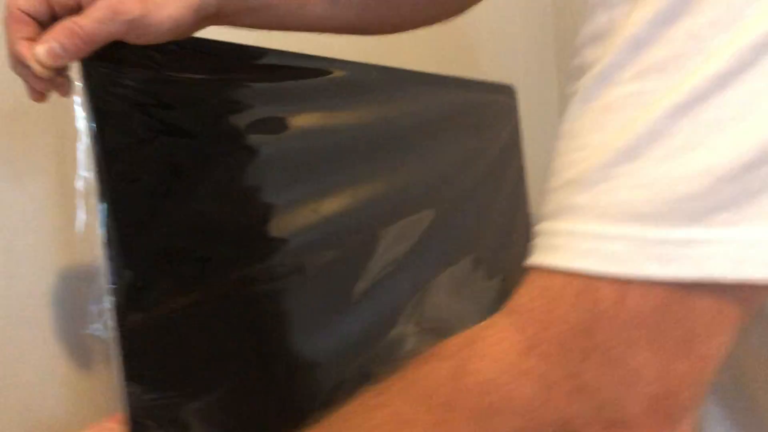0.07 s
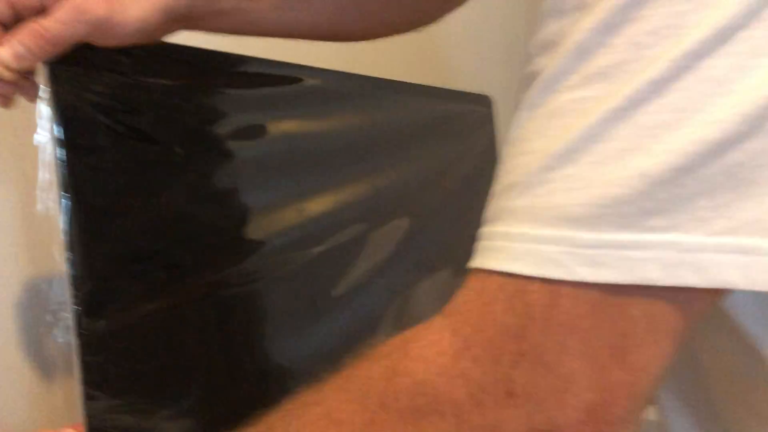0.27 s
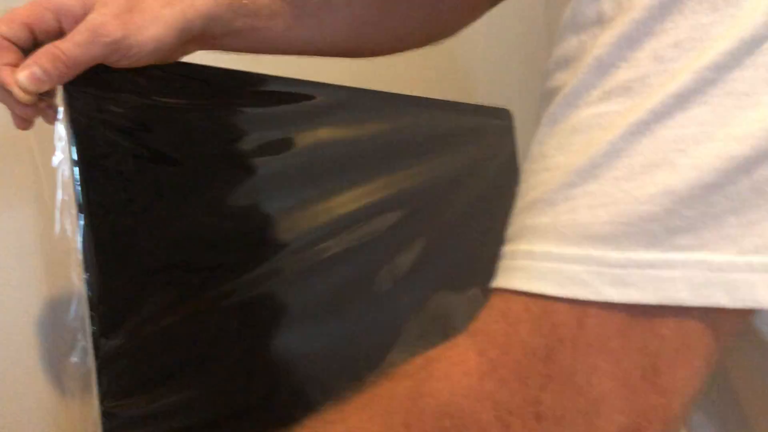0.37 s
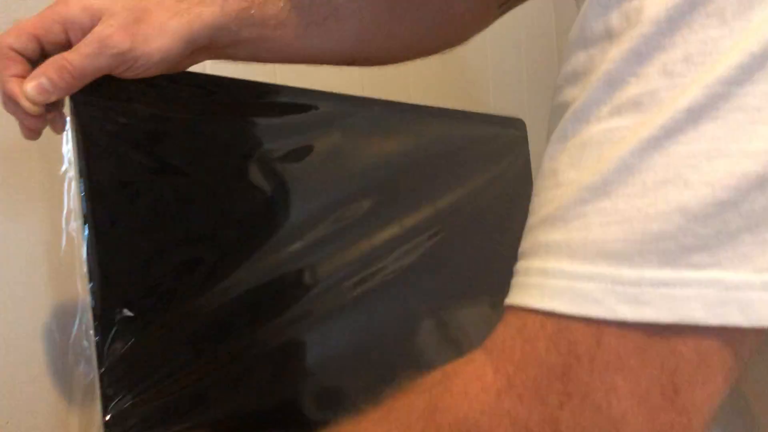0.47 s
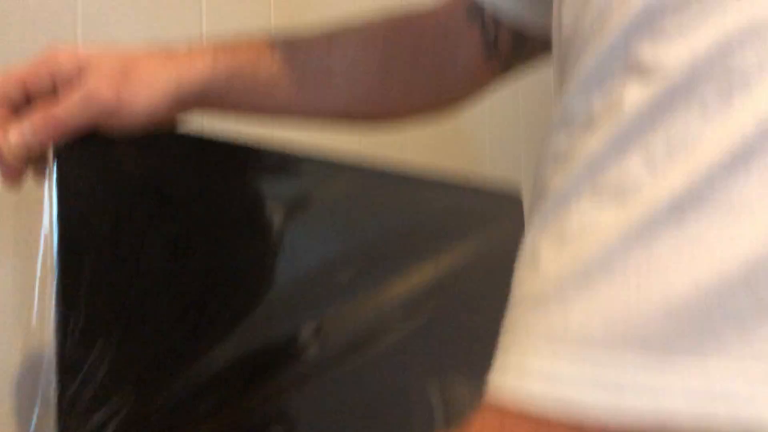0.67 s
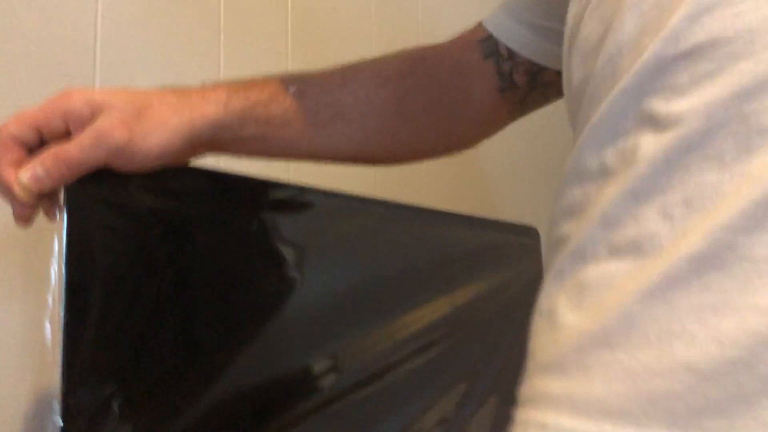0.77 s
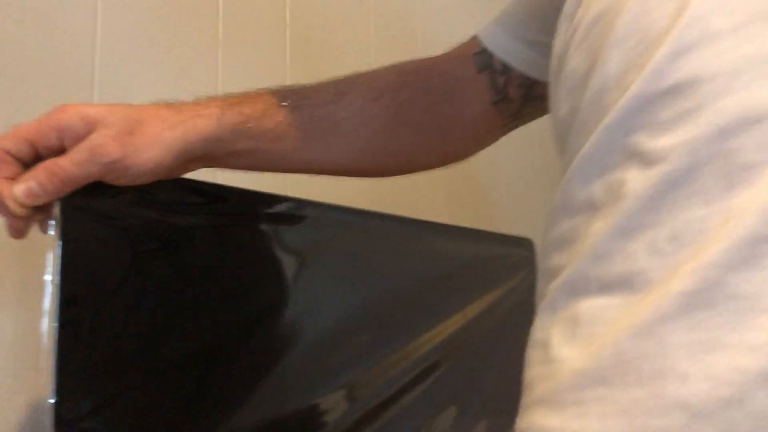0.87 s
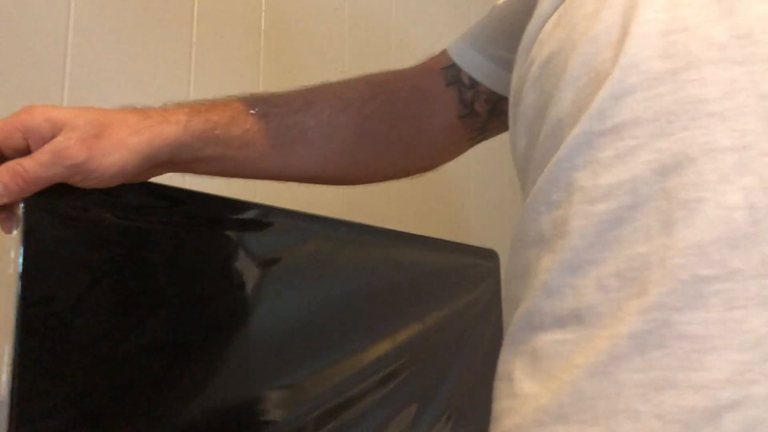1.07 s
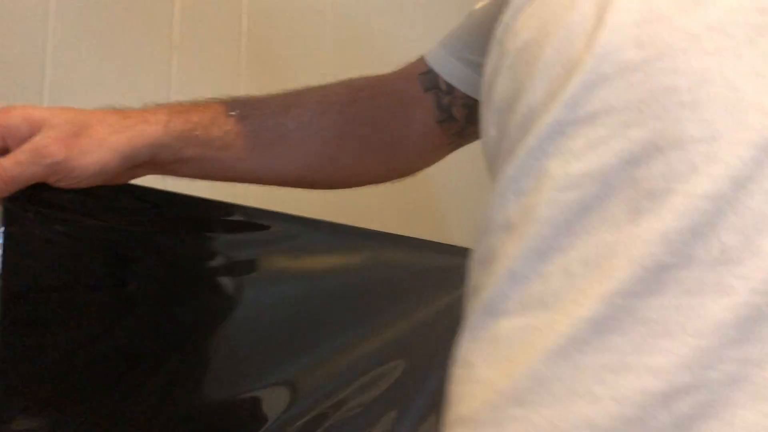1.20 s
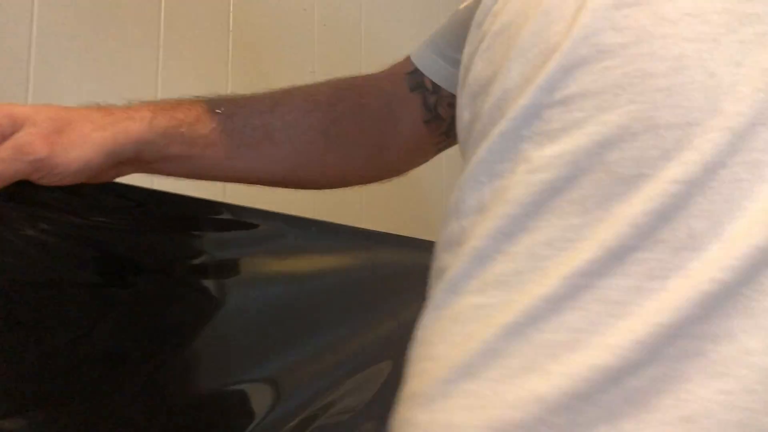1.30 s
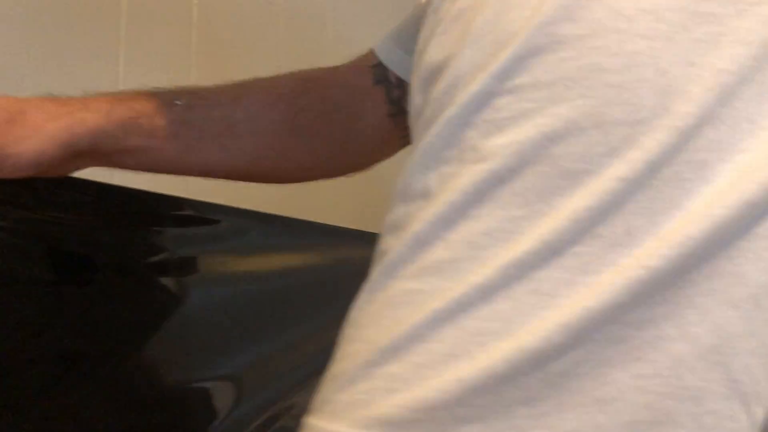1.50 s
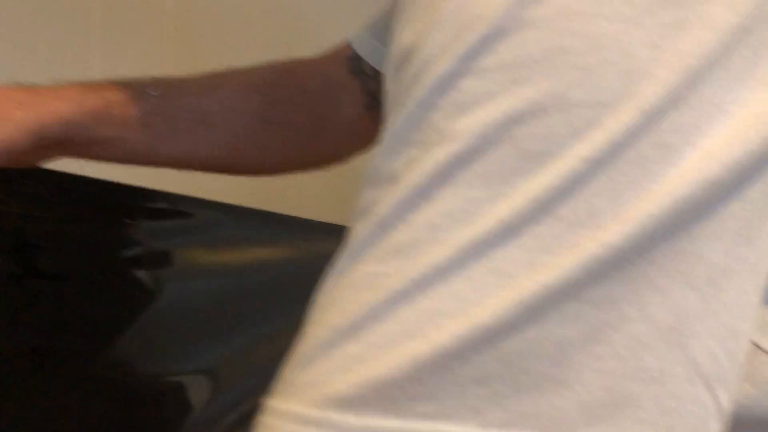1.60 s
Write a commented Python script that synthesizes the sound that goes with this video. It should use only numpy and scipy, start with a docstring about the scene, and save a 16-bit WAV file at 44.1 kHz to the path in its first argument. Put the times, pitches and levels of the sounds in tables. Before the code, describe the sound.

Peeling clear film off a panel, sharp crinkly snaps and small pops, close in a small room

```python
"""Clear film is peeled off a glossy panel in a small room, close to a phone microphone.
Each release is a sharp snap or a short pop: a burst of tiny filtered clicks, followed by fading noise.
Strong tugs thump the panel as dying sine waves, and the snaps make it ring at higher pitches.
A fine rustle of flickering, filtered noise runs underneath, over the quiet hum of the room."""
import sys
import numpy as np
from scipy import signal
from scipy.fft import rfft, irfft
from scipy.io import wavfile
from scipy.ndimage import uniform_filter1d

SR = 44100
rng = np.random.default_rng(int(sys.argv[2]) if len(sys.argv) > 2 else 0)


def unload_wav(signal):
    """Save mono or channel-first audio to the path in sys.argv[1] as 16-bit WAV at rate SR, clipped to [-1, 1]."""
    wavfile.write(
        sys.argv[1],
        SR,
        np.round(np.clip(np.atleast_2d(signal).T, -1, 1) * 32767).astype(np.int16),
    )


N = 72765  # length in samples


def gain_of(db):
    """Turn decibels into a factor for the amplitude."""
    return 10 ** (np.asarray(db) / 20)


def evened(x):
    """Scale a signal to an average (RMS) level of 1."""
    return x / np.sqrt(np.mean(x ** 2) + 1e-20)


def unit_energy(x):
    """Scale a signal so that its squares add up to 1."""
    return x / np.linalg.norm(x)


def read(points, hz):
    """Read a curve of (frequency, value) points, with frequency on a log scale."""
    f, value = np.transpose(points)
    return np.interp(np.log(hz + 1), np.log(f + 1), value)


def causal(gain):
    """Impulse response with this gain that starts at once (minimum phase)."""
    log_gain = np.log(np.maximum(gain, 1e-4))
    full = np.r_[log_gain, log_gain[-2:0:-1]]  # both halves of the spectrum
    return np.fft.ifft(np.exp(full - 1j * signal.hilbert(full).imag)).real


TICKS = 24  # ticks after the leading one
LAG_TURNS = 0.8  # lower parts arrive later, by this many of their periods
SPREAD_TURNS = 1.5  # lower parts last longer, by this many of their periods
SHARP_MS = 1.24  # in clusters longer than this, later ticks can outgrow the leading one
ECHO_MS, ECHO_DB = 1.0, -2  # off the panel: middle delay, level against the leading tick


def tick_of(hz, octaves):
    """One tick: a click through a bell-shaped band, later for low pitches."""
    f = np.fft.rfftfreq(1024, 1 / SR) + 1
    tick = causal(np.exp(-(np.log2(f / hz) / octaves) ** 2 / 2))[:400]
    lag = np.zeros(int(LAG_TURNS * SR / hz))
    return np.r_[lag, tick][:400]


def click_train(hz, length_ms):
    """A leading click, its panel echo and random clicks that thin out with time."""
    when, size = rng.random((2, TICKS))
    spread_s = length_ms / 1000 + SPREAD_TURNS / hz
    delay_s = -np.log(1 - 0.95 * when) * spread_s
    later_gain = 0.5 + (length_ms / SHARP_MS) ** 2 / 2
    train = np.zeros(2048)
    np.add.at(train, (delay_s * SR).astype(int), (2 * size - 1) ** 3 * later_gain)
    train[0] += 1
    echo_delay_ms = ECHO_MS * (0.5 + size[0])
    train[int(echo_delay_ms * SR / 1000)] += gain_of(ECHO_DB)
    return train


NEAR_DB, NEAR_T60 = -3, 0.052  # near scatter: level for very long clusters, time to fall 60 dB [s]
AFTER_DB, AFTER_T60, AFTER_LUMP_DB = -15.5, 0.38, 5  # crackle: level, fall time [s], lumpiness
ROOM_DB = -10
# How long the room rings in each band: (frequency [Hz], time to fall by 60 dB [s])
ROOM_FADE = [(400, 0.84), (2000, 0.37), (5000, 0.17), (13000, 0.11)]


def room_tail(seconds):
    """Room reverberation: noise of energy 1 whose bands die at their own speed."""
    hz, t, z = signal.stft(rng.standard_normal(int(seconds * SR)), SR, nperseg=128)
    fade = gain_of(-60 * t / read(ROOM_FADE, hz)[:, None])
    return unit_energy(signal.istft(z * fade, SR, nperseg=128)[1])


def after_sound(length_ms):
    """Near scatter, lumpy crackle as the freed film settles, then the room: all fading noise."""
    t = np.arange(SR // 2) / SR
    scatter = rng.standard_normal(len(t)) * gain_of(-60 * t / NEAR_T60)
    lumps = evened(uniform_filter1d(rng.standard_normal(len(t)), size=120))
    crackle = rng.standard_normal(len(t)) * gain_of(AFTER_LUMP_DB * lumps - 60 * t / AFTER_T60)
    near_share = np.sqrt(length_ms / (length_ms + SHARP_MS))  # short clusters stay drier
    path = gain_of(NEAR_DB) * near_share * unit_energy(scatter)
    path += gain_of(AFTER_DB) * unit_energy(crackle)
    path[300:] += gain_of(ROOM_DB) * room_tail(0.5)[:len(t) - 300]
    return path


def release(parts, length_ms):
    """Film letting go: ticks differ in each part (dB, Hz, octaves); their colour also tints the tail."""
    cluster, colour = 0, 0
    for db, hz, octaves in parts:
        tick = tick_of(hz, octaves)
        ticks = signal.fftconvolve(click_train(hz, length_ms), tick)
        gain = gain_of(db) * np.sqrt(SR / 100)  # the level counts over 10 ms
        cluster = cluster + gain * unit_energy(ticks)
        colour = colour + gain * unit_energy(tick)
    sound = signal.fftconvolve(colour, after_sound(length_ms))
    sound[:len(cluster)] += cluster
    return sound


# Broad snaps: (time [s], pitch of the low part [Hz], then low, middle, high and top part:
# level over 10 ms [dB] each, basic cluster length [ms])
SNAPS = [(0.0544, 2620, -52.5, -55, -53, -71, 0.93), (0.111, 1390, -48.5, -55.5, -79, -72, 1.5),
         (0.2233, 1010, -37, -35.5, -51, -57, 0.51), (0.239, 920, -53.5, -40, -48, -63, 0.29),
         (0.2777, 970, -53, -56, -61, -70, 3.15), (0.4521, 2364, -39.5, -31, -33, -43, 0.69),
         (0.478, 1390, -47, -58, -50, -55, 2.98), (0.5445, 2880, -88, -53, -55, -54, 0.62),
         (0.5622, 2950, -58, -48.5, -47.5, -36, 1.7), (0.5789, 2300, -55.5, -50.5, -53.5, -57, 7.9),
         (0.61, 2900, -69, -56, -48.5, -55.5, 1.26), (0.6172, 1750, -55.5, -50.5, -54, -57, 3.5),
         (0.669, 2000, -62, -51.5, -52, -51, 2.8), (0.712, 1350, -45.5, -55, -59, -60, 0.7),
         (0.762, 2680, -66, -58, -53.5, -56, 8), (0.8066, 1920, -55, -42.5, -37.5, -41, 2.07),
         (0.8326, 1390, -41.5, -47, -41.5, -46, 1.82), (0.9136, 2970, -44.5, -34.5, -31, -43.5, 0.17),
         (1.0189, 1780, -50.5, -45.5, -49, -62, 1.37), (1.0976, 1230, -47.5, -53, -64, -70, 2.2),
         (1.1687, 1950, -50.5, -41, -39.5, -40, 1.9), (1.1777, 1400, -46.5, -37.5, -40, -51, 1.82),
         (1.1932, 2430, -44, -45.5, -42, -47, 3.6), (1.2096, 2090, -45.5, -43, -52, -55, 2.56),
         (1.2197, 1690, -42.5, -45, -43.5, -67, 2.06), (1.2479, 1646, -36.5, -48.5, -42.5, -50, 1.86),
         (1.2528, 1460, -50, -48, -47, -73, 2), (1.268, 2410, -59, -42, -38, -57, 2.7),
         (1.2953, 1810, -40.5, -47, -46.5, -54, 2)]
# Centres of the middle, high and top part: (frequency [Hz])
UPPER_PART_HZ = [4670, 8250, 13100]
# Widths of the four parts, low to top: (width [octaves])
PART_WIDTHS = [0.84, 0.46, 0.383, 0.29]


def snaps():
    """Broad snaps, each built from four parts of the spectrum."""
    film = np.zeros(N + SR)
    for s, low_hz, *levels_db, length_ms in SNAPS:
        parts = zip(levels_db, [low_hz] + UPPER_PART_HZ, PART_WIDTHS)
        sound = release(parts, length_ms)
        film[round(s * SR):][:len(sound)] += sound
    return film[:N]


POP_OCT, POP_MS = 0.42, 0.47  # width in octaves, basic cluster length in ms
# Narrow pops: (time [s], pitch [Hz], level over 10 ms [dB])
POPS = [(0.0862, 1670, -57), (.358, 2140, -53), (0.4485, 11000, -55), (0.5038, 13000, -50.5),
        (.675, 9200, -46.5), (0.694, 13500, -56), (0.7203, 4300, -51), (.7312, 12000, -59),
        (0.8411, 4270, -43), (.864, 1500, -48.5), (0.9212, 4870, -39.5), (0.9695, 4400, -44),
        (0.9932, 2400, -49.5), (1.0737, 1590, -56), (1.1367, 2470, -51), (1.3987, 11300, -64),
        (1.5573, 2210, -62.5)]


def pops():
    """Narrow pops of the film, each built from a single band."""
    film = np.zeros(N + SR)
    for s, hz, db in POPS:
        sound = release([(db, hz, POP_OCT)], POP_MS)
        film[round(s * SR):][:len(sound)] += sound
    return film[:N]


TUG_RISE_S = 0.0023
# Strong tugs: (time [s], then middle, lowest and upper panel mode: level [dB] each)
TUGS = [(0.227, -39, -40, -40), (0.277, -40.5, -67, -36.5), (0.831, -45.5, -52, -40.5),
        (1.197, -43, -45, -38), (1.22, -44, -67, -39), (1.25, -40, -36, -35.5), (1.294, -45, -46.5, -34)]
# Low panel modes in that order: (middle of the random pitch, roughly [Hz], time to fall by 60 dB [s])
LOW_MODES = [(269.3, 0.12), (118, 0.035), (411.6, 0.041)]


def panel_thumps():
    """Tugs swell the low modes of the panel, which then die away as sine waves."""
    t = np.arange(SR // 2) / SR
    swell = 1 - np.exp(-(t / TUG_RISE_S) ** 2)
    out = np.zeros(N + SR)
    for s, *levels_db in TUGS:
        for db, (hz, t60) in zip(levels_db, LOW_MODES):
            wave = np.sin(2 * np.pi * hz * rng.uniform(0.924, 1.05) * t)
            out[round(s * SR):][:len(t)] += gain_of(db - 60 * t / t60) * swell * wave
    return out[:N]


# Higher panel modes: (frequency [Hz], strength of the ringing [dB], time to fall by 60 dB [s])
HIGH_MODES = [(897, -43.5, 0.058), (1565, -49, 0.12)]


def panel_ring(film):
    """The sound of the film rings the panel's higher modes, as dying sine waves."""
    t = np.arange(SR // 2) / SR
    ring = sum(gain_of(db - 60 * t / t60) * np.sin(2 * np.pi * hz * t) for hz, db, t60 in HIGH_MODES)
    return signal.fftconvolve(film, ring)[:N]


PATCH_DB, FLICKER_DB = 3, 2.5  # strength of the drifting patches and of the quick flutter
WHISTLE_WIDTH_HZ = 260  # from the centre to half the lift
# Rustle of the moving film: (time [s], level [dB], treble level [dB])
RUSTLE = [(0, -65, -78), (.12, -91, -89), (0.149, -58, -58), (.21, -62.5, -64.5), (.3, -89, -75),
          (.39, -56.5, -67), (.44, -70, -75), (.6, -57, -70), (.74, -58, -69), (1.14, -67.5, -76.5),
          (1.401, -64, -84), (1.55, -64, -77), (1.65, -55, -66)]
# Colour of the rustle: (frequency [Hz], relative level per Hz [dB])
RUSTLE_TONE = [(500, -15), (1700, -9), (7000, -9.5), (16500, -19)]
# Narrow bands that stand out in the hiss: (frequency [Hz], lift [dB])
WHISTLES = [(3300, 8), (6550, 10)]


def rustle():
    """Soft hiss with drifting patches, lower and treble part on their own levels."""
    s, *levels_db = np.transpose(RUSTLE)
    hz, t, z = signal.stft(rng.standard_normal(N + 256), SR, nperseg=256)
    patches = uniform_filter1d(rng.standard_normal(z.shape), size=2, axis=0)  # across frequency
    patches = evened(uniform_filter1d(patches, size=30, axis=1))  # along time
    flicker_db = FLICKER_DB * rng.standard_normal(len(t))
    lift_db = sum(db / (1 + ((hz - f) / WHISTLE_WIDTH_HZ) ** 2) for f, db in WHISTLES)
    tone_db = read(RUSTLE_TONE, hz) + lift_db
    z = z * gain_of(tone_db[:, None] + PATCH_DB * patches + flicker_db)
    low_share = 1 / (1 + (hz[:, None] / 7500) ** 6)
    out = 0
    for share, level_db in zip((low_share, 1 - low_share), levels_db):
        hiss = evened(signal.istft(z * share, SR, nperseg=256)[1][:N])
        out = out + hiss * gain_of(np.interp(np.arange(N) / SR, s, level_db))
    return out


HUM_DB = -59
DRONE_HZ, DRONE_DB = 70.1, -67.5
# Colour of the room tone and microphone hiss: (frequency [Hz], relative level per Hz [dB])
HUM_TONE = [(25, -4.5), (252, 4), (687, -11.5), (5600, -20.5), (14800, -41), (16500, -71)]


def hum():
    """Low room tone and microphone hiss from shaped noise; a very narrow noise band wavers as a drone."""
    hz = np.fft.rfftfreq(N, 1 / SR)
    drone = irfft(rfft(rng.standard_normal(N)) / (1 + ((hz - DRONE_HZ) / 5) ** 2), N)
    tone = irfft(rfft(rng.standard_normal(N)) * gain_of(read(HUM_TONE, hz)) * (hz > 20), N)
    return gain_of(HUM_DB) * evened(tone) + gain_of(DRONE_DB) * evened(drone)


def scene():
    """Add the film, the panel it shakes, the rustle and the hum, as one channel."""
    film = snaps() + pops()
    panel = panel_thumps() + panel_ring(film)
    return (film + panel + rustle() + hum())[None]


EDGE_HZ = 16300


def record(dry):
    """The band limit: a steep filter takes away what lies above the edge."""
    low_pass = signal.firwin(511, EDGE_HZ, window=("kaiser", 9), fs=SR)
    return signal.oaconvolve(dry, low_pass[None], "same")


dry = scene()
out = record(dry)
unload_wav(out)
```